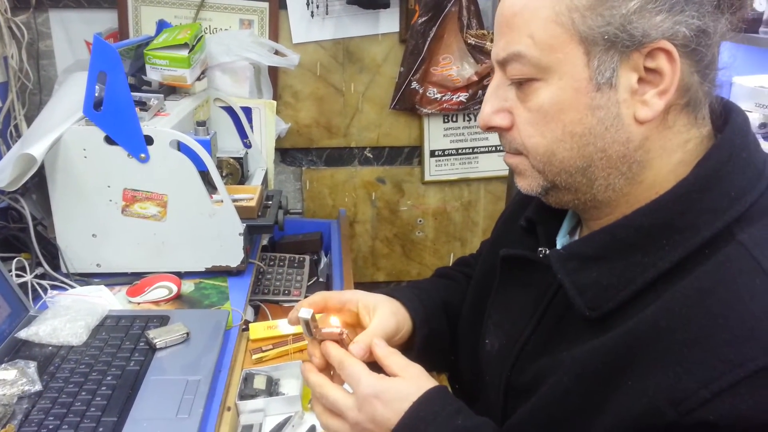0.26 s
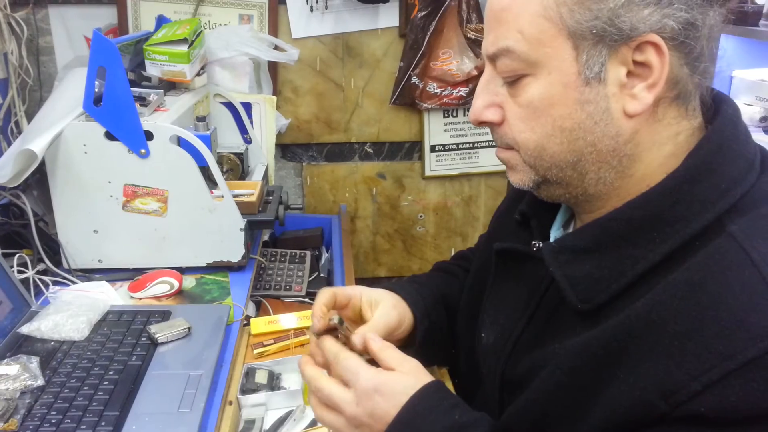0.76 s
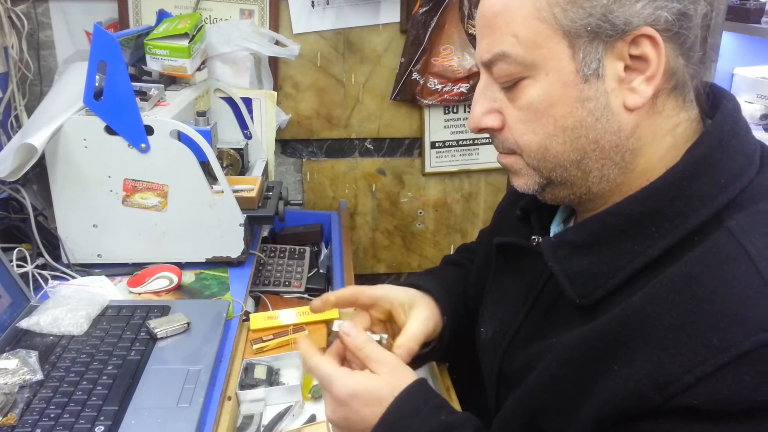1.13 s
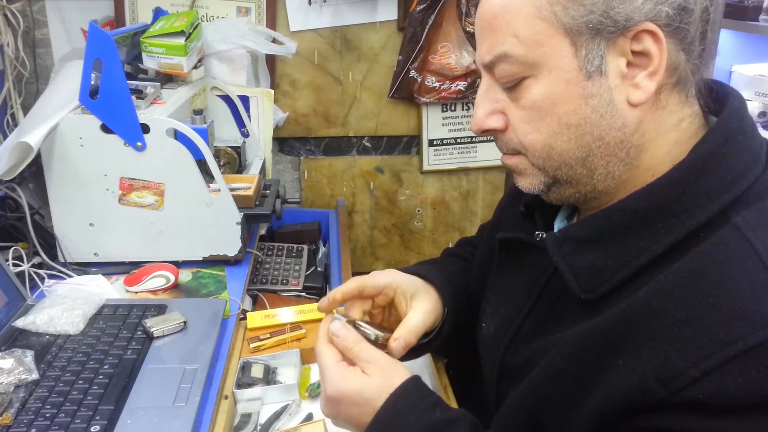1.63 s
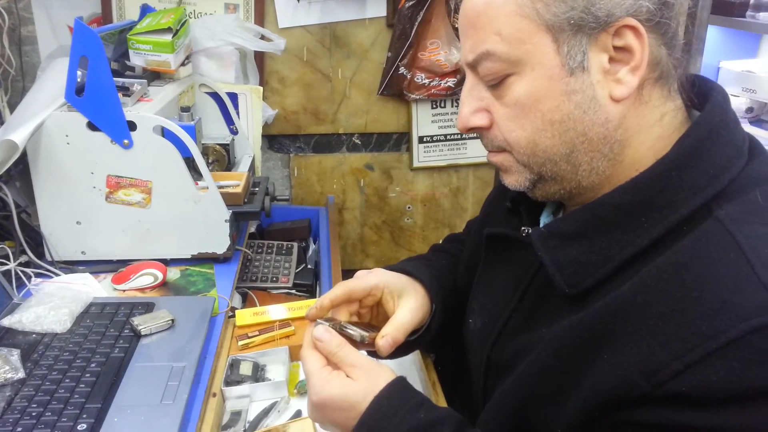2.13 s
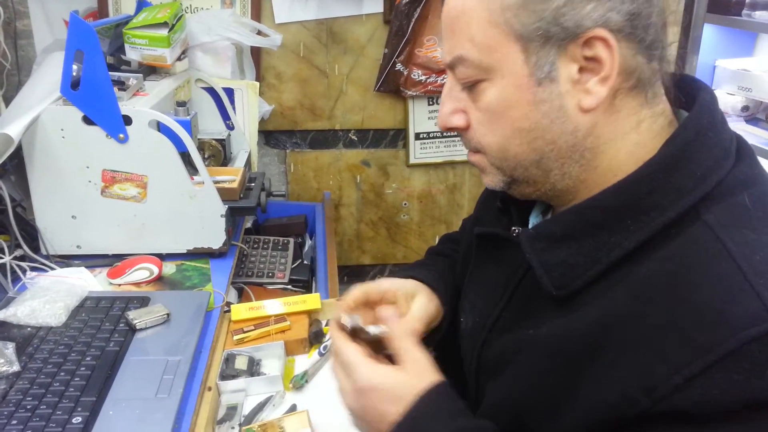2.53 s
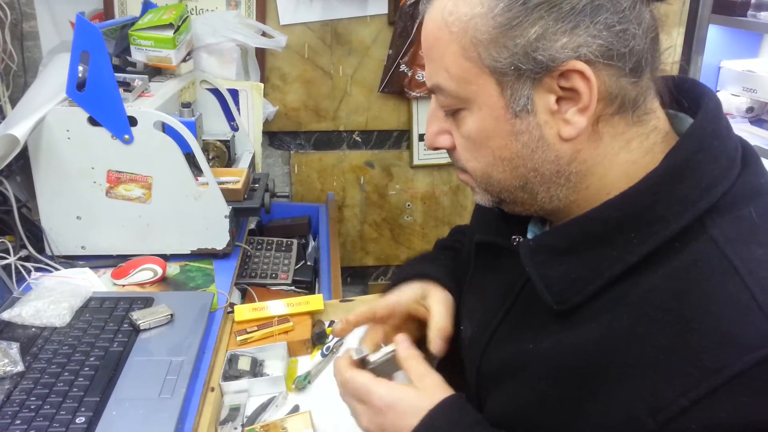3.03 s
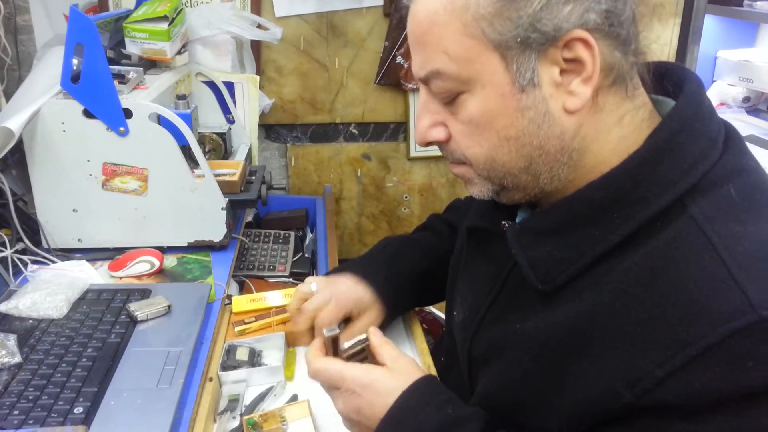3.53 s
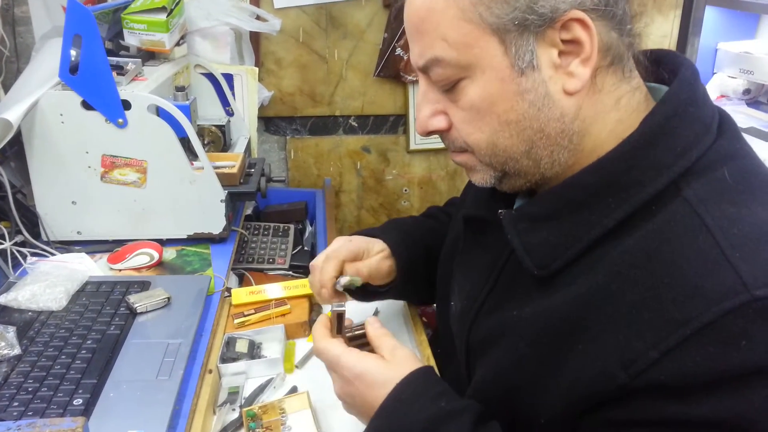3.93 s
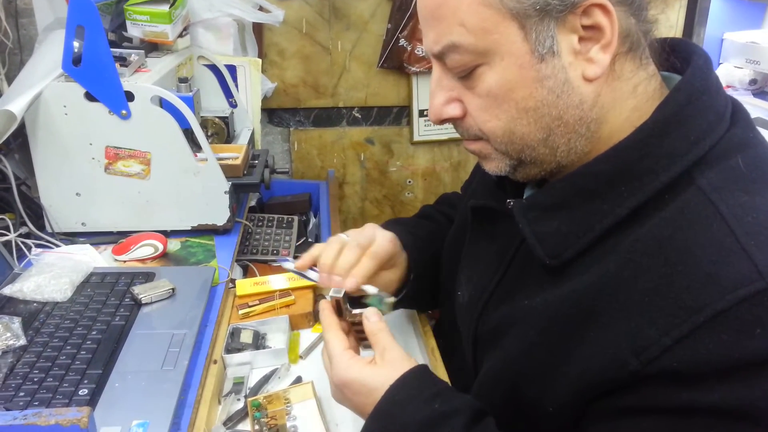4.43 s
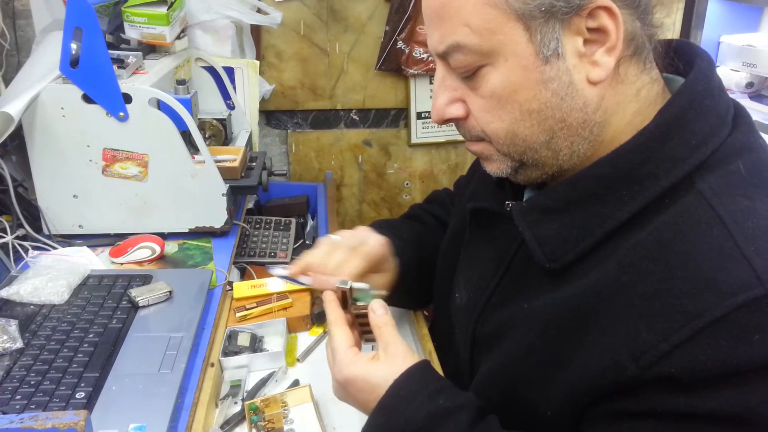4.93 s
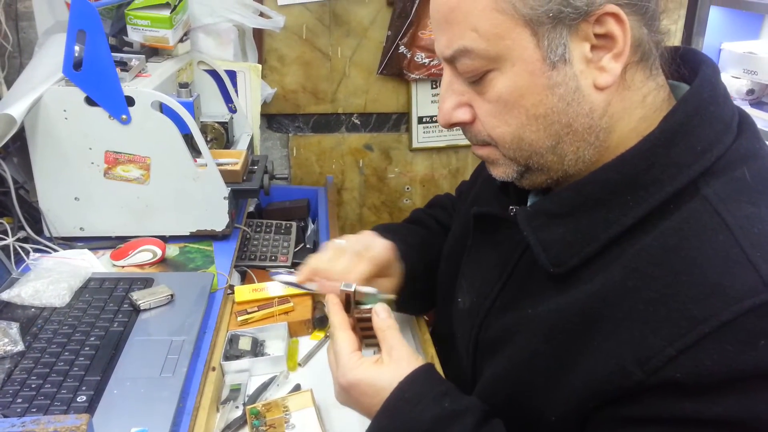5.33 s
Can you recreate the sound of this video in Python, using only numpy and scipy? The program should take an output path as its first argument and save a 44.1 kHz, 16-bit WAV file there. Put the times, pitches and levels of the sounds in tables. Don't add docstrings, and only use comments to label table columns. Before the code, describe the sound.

Close stereo phone sound of a lighter being handled: soft background hum, one very loud, slightly clipped snap, a clinking flick with a short high ring, near-quiet with a tick or two, then two bursts of woody knocking and scraping, small metal clicks and dry finger rubbing. The background swells around loud sounds; little reverberation.

```python
import sys
import numpy as np
from scipy import signal
from scipy.io import wavfile
from scipy.ndimage import uniform_filter1d

SR = 44100
rng = np.random.default_rng(int(sys.argv[2]) if len(sys.argv) > 2 else 0)


def pcm_store(signal):
    levels = np.round(np.clip(np.atleast_2d(signal), -1, 1) * 32767)
    wavfile.write(sys.argv[1], SR, levels.astype(np.int16).T)


def ratio_of_db(decibels):
    return 10 ** (np.asarray(decibels, float) / 20)


N = 246166

AIR_LAG, LAG = -17, -4
NEAR_DEEP_HZ = 1300
# mode_hz, width_hz, level_db
OPEN_CASE = [(800, 250, -4), (2000, 250, -4), (3390, 120, 7), (4850, 90, 5), (7480, 150, 1), (9200, 150, 3),
             (12400, 900, -1)]
# mode_hz, width_hz, level_db
CLOSED_CASE = [(800, 250, -12), (2000, 250, -2), (3430, 320, 1), (4850, 110, 5), (7510, 150, 2),
               (9220, 150, 7), (12300, 900, -1)]
# mode_hz, width_hz, level_db
HOLLOW = [(430, 160, -11), (900, 99, 0), (1474, 120, -6.5), (2000, 143.4, -8)]
# freq_hz, level_db
TOUCH_SPECTRUM = [(150, -2.5), (700, -8.5), (1900, 1.5), (3400, 1.5), (4900, -4), (9000, -6),
                  (11500, -15.5), (14600, -36)]


def evened(x):
    return x / np.sqrt(np.mean(x ** 2) + 1e-20)


def read(points, hz):
    f, value = np.transpose(points)
    return np.interp(np.log(hz + 1), np.log(f + 1), value)


def along(tables, column):
    t, value, gate = np.arange(N) / SR, np.zeros(N), np.zeros(N)
    for rows in tables:
        rows = np.array(rows)
        inside = (t >= rows[0, 0]) & (t <= rows[-1, 0])
        value[inside] = np.interp(t[inside], rows[:, 0], rows[:, column])
        gate[inside] = 1
    return value, gate


def level(tables, column, soft=60):
    db, gate = along(tables, column)
    return uniform_filter1d(ratio_of_db(db) * gate, int(soft))


def swells(rows, hold_s=0):
    t = np.arange(N) / SR
    total = 0
    for s, db, rise, fall, *_ in rows:
        away = np.maximum((s - hold_s - t) / rise, (t - s - hold_s) / fall)
        total = total + ratio_of_db(db - 20 * np.maximum(away, 0))
    return total


def colour(x, spectrum, even=True):
    hz = abs(np.fft.fftfreq(4096, 1 / SR))
    log_gain = np.log(ratio_of_db(np.maximum(read(spectrum, hz), -90)))
    taps = np.fft.ifft(np.exp(np.conj(signal.hilbert(log_gain)))).real[:2048]
    taps = taps / np.linalg.norm(taps) ** even
    return signal.oaconvolve(x, taps.reshape((1,) * (x.ndim - 1) + (-1,)), axes=-1)[..., :N]


def highpass(x, order, hz):
    return signal.sosfilt(signal.butter(order, hz, "high", fs=SR, output="sos"), x)


def resonate(x, hz, width):
    r = np.exp(-np.pi * width / SR)
    if np.ndim(hz) == 0:
        return 2 * signal.lfilter([1 - r], [1, -r * np.exp(2j * np.pi * hz / SR)], x).real
    turn = np.exp(2j * np.pi * np.cumsum(hz) / SR)
    return 2 * (turn * signal.lfilter([1 - r], [1, -r], x / turn)).real


def body(x, modes, ring_db):
    ringing = 0
    for k, (hz, width, db) in enumerate(modes):
        ringing = ringing + (-1) ** k * ratio_of_db(db) * resonate(x, hz, width)
    return x + ratio_of_db(ring_db) * ringing


def ports(pan_db):
    return ratio_of_db(pan_db * np.array([[.5], [-.5]]))


def pair(same, lag, deep_hz=500):
    a, b = rng.standard_normal((2, N))
    same = np.clip(same, 0, 1)
    treble = np.array([np.roll(a, int(lag)), same * a + np.sqrt(1 - same ** 2) * b])
    low, high = (signal.butter(1, deep_hz, kind, fs=SR) for kind in ("low", "high"))
    return signal.lfilter(*low, a + 0.3 * (treble - a)) + signal.lfilter(*high, treble)


def grit(rough_db, span):
    return evened(ratio_of_db(rough_db * evened(uniform_filter1d(rng.standard_normal(N), int(span)))))


def blows(table, spectrum, modes, ring_db, own_db, sharpness, pan_db):
    shape, own_hz = np.zeros(N), np.full(N, table[0][4] * 1.)
    t = np.arange(6000) / SR
    for s, db, rise, t60, hz in table:
        at = round(s * SR)
        shape[at:][:len(t)] += np.clip(t / rise, 0, 1) * ratio_of_db(db - 60 * t / max(t60, .004))
        own_hz[at:] = hz
    rattle = shape * ports(pan_db) * pair(.5, LAG, NEAR_DEEP_HZ) * grit(1.2, 30)
    width = np.mean(table, 0)[4] / sharpness
    own = resonate(resonate(rattle, own_hz, width), own_hz, width)
    return body(colour(rattle, spectrum), modes, ring_db) + ratio_of_db(own_db) * own


def tone(hz, gain, width):
    fuzz = evened(resonate(pair(0.37, 0.9), hz, width))
    steady = 1.15 * np.sqrt(2) * np.sin(2 * np.pi * np.cumsum(hz) / SR)
    return (steady + .6 * fuzz) * gain


def air():
    # freq_hz, level_db
    air_spectrum = [(15, -67), (25, -33), (54, -34), (75, -13), (111, -16.5), (145, -10), (211, -16.5),
                    (306, -14.5), (508, -21.5), (565, -20.5), (663, -28), (799, -27.5), (3550, -35.5),
                    (9030, -37), (14600, -40.5)]
    _, _, z = signal.stft(colour(pair(0.36, AIR_LAG), air_spectrum), SR, nperseg=512)
    patches = rng.standard_normal(z.shape[1:])
    patches = evened(uniform_filter1d(uniform_filter1d(patches, 8, 0), 8, 1))
    return evened(signal.istft(z * ratio_of_db(1.2 * patches), SR, nperseg=512)[1][:, :N])


def fan_hum():
    # tone_hz, width_hz, level_db
    hums = [(80, 30, -76.5), (145, 10, -72), (7504, 3, -99)]
    low, fan, thin = (ratio_of_db(db + 69.5) * evened(resonate(pair(0.96, 0), hz, w)) for hz, w, db in hums)
    eased = np.clip((np.arange(N) / SR - 3.89) / 0.38, 0, 1)
    return low * ratio_of_db(-1.5 * eased) + fan * ratio_of_db(-9 * eased) + thin


def whine():
    # start_s, length_s, from_hz, to_hz, level_db
    jumps = [
        (.025, .305, 11200, 11650, -88),
        (1.335, .035, 11600, 11600, -94),
        (1.905, .055, 11500, 11700, -95),
        (2.56, .045, 11500, 11500, -95),
        (3.185, .06, 11600, 11700, -95),
        (5.145, .295, 11750, 11350, -90.5),
    ]
    t = np.arange(N) / SR
    hz = 9130 + 17 * t
    db = -94.5 + .75 * t
    wobble_hz = 140 * evened(uniform_filter1d(rng.standard_normal(N), 1200))
    for s, length, from_hz, to_hz, jump_db in jumps:
        up = (t >= s) & (t < s + length)
        glide_hz = from_hz + (to_hz - from_hz) * (t - s) / length
        hz[up] = (glide_hz + wobble_hz)[up]
        db[up] = jump_db
    return tone(hz, ratio_of_db(db), 45.7)


def hoots():
    # peak_s, level_db, rise_s, fall_s, pitch_hz
    calls = [
        (.27, -81, .05, 0.19, 807),
        (.33, -80, .1, 0.14, 811.2),
        (.39, -98, .1, 0.043, 807),
        (.88, -80, .057, 0.06, 779),
        (1.909, -74, .02, .016, 818.6),
    ]
    s, hz = np.transpose(calls)[[0, 4]]
    return tone(np.interp(np.arange(N) / SR, s, hz), swells(calls), 9.1)


def background(lift_db):
    flutter = grit(1.1, 2000)
    return ratio_of_db(-68 + lift_db) * (ratio_of_db(-3.5) * air() + fan_hum()) * flutter + whine() + hoots()


def finger_rubs():
    # peak_s, level_db, fall_s
    strokes = [(.29, -74, 0.13), (2.554, -72.5, 0.11), (4.638, -64.5, 0.027), (4.693, -54.5, 0.26),
               (4.804, -61.5, 0.073), (4.925, -60, 0.0487), (5.01, -68, .12), (5.108, -66, 0.081),
               (5.212, -61.5, 0.017), (5.284, -58, 0.067), (5.408, -58, 0.017), (5.492, -60, 0.087)]
    # freq_hz, level_db
    skin_spectrum = [(180, -10.5), (300, -7.5), (443, 1.5), (488, -9), (783, -8.5), (1820, -10.5),
                     (2650, -12), (3850, -6.5), (6680, -10), (9250, -6), (14600, -17.5)]
    rub = evened(colour(pair(0.17, AIR_LAG) * grit(2.5, 68), skin_spectrum))
    rows = [(s, db - 3.5, 0.017, 0.72 * fall) for s, db, fall in strokes]
    return ratio_of_db(1.5) * rub * swells(rows, hold_s=0.017)


def ticks():
    # start_s, peak_db, rise_s, t60_s,
    # own_hz
    clicks = [(.392, -67.5, 0.005, 0.061, 9300), (1.1, -52, 0.0088, 0.24, 9200),
              (1.28, -62.5, 0.0022, 0.02, 9740), (1.288, -62.5, 0.002, 0.032, 11150),
              (1.92, -70, .008, 0.11, 11160), (2.152, -65, 0.0026, 0.025, 7870),
              (2.156, -48, .0003, 0.1, 9470), (2.545, -69, 0.014, 0.076, 8880),
              (3.19, -65.5, 0.032, 0.15, 11100), (3.4872, -52, 0.00092, 0.037, 6030),
              (3.5575, -47, .001, 0.084, 8900), (3.847, -57, .001, 0.053, 7000),
              (4.245, -66, 0.0055, 0.096, 9700)]
    # freq_hz, level_db
    click_spectrum = [(500, -49), (1500, -34), (3500, -7), (6500, -15), (9600, 0.5), (12000, -6.5),
                      (14600, -21)]
    return blows(clicks, click_spectrum, OPEN_CASE, ring_db=-28.5, own_db=2.7, sharpness=45.01, pan_db=1.77)


def lid_snaps():
    # start_s, peak_db, rise_s, t60_s, own_hz
    snaps = [
        (.6375, -51, 0.0007, 0.01, 9500),
        (.6445, -48.5, .001, 0.0052, 9500),
        (.654, -39.5, 0.0044, 0.025, 4000),
        (.6572, -31, 0.0004, 0.02, 3400),
        (.6601, -0.5, 0.0001, 0.013, 7600),
        (.6628, -12, 0.0003, .016, 9200),
    ]
    # freq_hz, level_db
    snap_spectrum = [(120, -58.5), (350, -40.5), (800, -23), (1250, -21), (2000, -11.5), (3000, -6),
                     (5000, -1), (6300, -2.5), (7500, -1.5), (9200, -3.5), (12900, -9), (14600, -13)]
    return blows(snaps, snap_spectrum, CLOSED_CASE, ring_db=7.6, own_db=5.1, sharpness=30.0, pan_db=3.2)


def pings():
    # start_s, pitch_hz, peak_db, t60_s, left_right_db
    struck_parts = [(.6603, 781.2, -21, 0.008, 17), (0.6596, 1575, -22.5, 0.025, 6),
                    (.6604, 1993, -17, 0.018, 4), (1.0857, 1586, -36, 0.04, -4),
                    (1.0856, 2190, -35.5, 0.021, 19), (1.0867, 3980, -36, 0.022, 2),
                    (1.0865, 4650, -43, 0.041, -2), (1.0865, 2493, -26, 0.034, 5),
                    (.6604, 3510, -20.5, 0.033, 0.5), (0.6609, 3020, -17.5, 0.02, -12),
                    (1.086, 7640, -31.5, 0.039, 5.5), (3.491, 4300, -44, 0.028, -4),
                    (3.56, 5070, -39, 0.031, 3.5), (3.402, 3150, -39.5, 0.035, 7),
                    (.706, 1014, -53, 0.089, -12), (3.73, 810, -42.5, 0.046, 16),
                    (3.818, 960, -44, 0.054, -5), (3.838, 462, -28, 0.11, 4.5),
                    (3.842, 966, -34.5, 0.11, -2), (3.851, 430, -21, 0.062, 0), (3.883, 503, -38, 0.06, -4),
                    (3.929, 940, -37, 0.05, 10), (3.931, 1585, -38, 0.029, 11), (3.943, 960, -42, 0.092, 12),
                    (3.958, 945, -38.5, 0.078, -1), (3.688, 2100, -47.5, 0.068, -6.5),
                    (3.85, 4800, -39.5, 0.045, -1), (4.244, 691, -52.5, 0.15, -1),
                    (4.244, 2212, -56.5, 0.12, 3.5), (4.25, 4200, -56.5, 0.11, 2),
                    (4.41, 4930, -48, 0.15, 7), (4.407, 1625, -45, 0.059, -2),
                    (4.412, 2340, -45.5, 0.091, -2),
                    (.6603, 1041, -24, .008, 3), (0.6656, 4869, -23, .06, -2), (.682, 4820, -33, .08, 0),
                 (.684, 7507, -33, 0.062, 4), (.688, 3509, -34, 0.087, 0), (.738, 4800, -43, .06, 0),
                 (1.086, 2678, -31, 0.031, 0), (1.086, 2957, -30, 0.029, 0), (3.4045, 3330, -39.5, 0.04, 8),
                 (3.4527, 2960, -43.5, 0.058, 0), (3.4888, 680, -26, .012, 0), (3.4915, 900, -26, 0.014, 4),
                 (3.5579, 558, -24.5, .016, 3.5), (3.5605, 1720, -26, 0.013, 10),
                 (3.5655, 800, -34, 0.013, -4), (3.5738, 624, -39, .012, -2), (3.8365, 439, -22.5, .08, 0),
                 (3.964, 957, -40, .07, -2), (3.847, 2000, -38.5, 0.022, 5), (3.885, 3350, -40, 0.017, 0),
                 (4.262, 2216, -50, .03, -4), (4.286, 2115, -61.5, .06, 0), (4.288, 4120, -62, .08, 0),
                 (4.415, 5250, -44, 0.068, 0), (4.424, 2280, -44, .04, 0), (4.44, 4760, -53, .07, 0),
                 (4.458, 4500, -53, .06, 0), (4.468, 5400, -52, .04, 0)]
    out, t = np.zeros((2, N + 8000)), np.arange(8000) / SR
    tremble = grit(2.0, 120)
    for s, hz, db, t60, pan_db in struck_parts:
        at = round(s * SR)
        sound = np.minimum(2 * t * hz, 1) * ratio_of_db(db - 60 * t / t60) * np.sin(2 * np.pi * hz * t)
        out[:, at:at + len(t)] += ports(pan_db) * sound
    return highpass(out[:, :N] * tremble, 3, 550)


def lid_rebound():
    # start_s, peak_db, rise_s, t60_s, own_hz
    bounces = [
        (.667, -26, 0.0019, 0.049, 4808),
        (.678, -23.5, 0.0065, 0.055, 4780),
        (.692, -28, .003, 0.039, 4670),
        (.703, -29.5, .006, 0.091, 4100),
        (.725, -39.5, 0.0073, 0.11, 4800),
        (.755, -48, 0.009, 0.077, 4810),
    ]
    # freq_hz, level_db
    bounce_spectrum = [(1400, -44), (1800, -20.5), (2500, -17), (3000, -1.5), (6300, -4), (9000, -3),
                       (12500, -7), (14600, -20.5)]
    return blows(bounces, bounce_spectrum, CLOSED_CASE, ring_db=-4.5, own_db=0.3, sharpness=5.0, pan_db=-2.5)


def jolts():
    # peak_s, level_db, rise_s, fall_s
    shudders = [
        (1.094, -55, .008, .07),
        (1.15, -63, .04, .1),
        (.76, -70, .04, .06),
    ]
    # freq_hz, level_db
    shudder_spectrum = [(90, -10), (150, -2), (320, 0), (550, -3), (1000, -12.5), (1500, -12), (2500, -19),
                        (5000, -39)]
    return evened(colour(pair(0.94, LAG), shudder_spectrum)) * swells(shudders)


def lid_flicks():
    # start_s, peak_db, rise_s, t60_s, own_hz
    flicks = [
        (1.053, -71.5, 0.002157, 0.048, 3390),
        (1.0635, -51, 0.0006, 0.065, 7960),
        (1.0772, -38.5, .0005, 0.035, 12590),
        (1.0857, -20.5, 0.0003, 0.029, 4040),
        (1.09, -27, .002, .07, 3903),
        (4.669, -64, 0.00202, .06, 4775),
        (4.6835, -41.5, 0.00036, 0.017, 7510),
    ]
    # freq_hz, level_db
    flick_spectrum = [(120, -29.5), (1250, -34.5), (1600, -22.5), (2300, -8.5), (3400, -2), (4200, -4),
                      (5500, -13), (7500, -9.5), (10300, -16), (14600, -25.5)]
    hits = blows(flicks, flick_spectrum, OPEN_CASE, ring_db=-5.0, own_db=3.1, sharpness=6.7, pan_db=-3.8)
    return highpass(hits, 4, 1450)


def lid_ring():
    # time_s, level_db, left_right_db
    swing = [
        (1.086, -19.5, -6.5),
        (1.094, -18.5, -8.5),
        (1.104, -16.5, -9.5),
        (1.118, -21.5, -12.5),
        (1.15, -35, -16),
        (1.172, -54.5, -19.5),
        (1.205, -74, -3),
        (1.235, -70.5, -2),
        (1.32, -93.5, -9.5),
    ]
    # peak_s, level_db, rise_s, fall_s
    nudges = [
        (1.056, -64, 0.003, .08),
        (4.686, -46, .003, .03),
        (4.698, -53, 0.012, 0.019),
        (4.74, -65, 0.041, 0.024),
        (4.779, -63, .004, 0.038),
        (4.8, -61.5, 0.0037, 0.051),
        (4.82, -63.5, 0.027, 0.014),
    ]
    # peak_s, level_db, rise_s, fall_s
    uppers = [
        (1.087, -40, 0.0006, 0.018),
        (1.104, -52.5, 0.00516, .03),
        (4.686, -46, 0.0012, 0.033),
        (4.798, -65, 0.0043, 0.037),
    ]
    t = np.arange(N) / SR
    late = np.array([[0], [1]])
    pan_db, swinging = along([swing], 2)
    pan_db = pan_db - 3 * (1 - swinging)
    fresh = swinging * np.exp(-np.maximum(t - swing[0][0], 0) / .012)
    turn = 2 * np.pi * np.cumsum(3406.5 - 22 * fresh) / SR
    low = (level([swing], 1, soft=70) + swells(nudges)) * np.sin(turn + late * (1.8 + 1.2 * fresh))
    upper = swells(uppers) * grit(6.0, 130) * np.sin(2 * np.pi * 7530 * t + late * .8)
    return ratio_of_db(6.0) * ports(pan_db) * (low + upper)


def taps():
    # start_s, peak_db, rise_s, t60_s, own_hz
    touches = [(1.68, -65, 0.033, 0.3, 4040), (1.76, -75, 0.032, 0.34, 4097),
               (3.688, -57, 0.003, 0.013, 3970), (4.242, -56.5, 0.003, 0.049, 2050),
               (4.252, -55.5, 0.0099, 0.087, 3910), (4.392, -66, 0.0022, 0.058, 6000),
               (4.398, -45.5, 0.002, 0.054, 5400), (4.407, -39, 0.0042, 0.055, 4820),
               (4.42, -44.5, 0.0058, 0.057, 5100), (4.459, -53, 0.0044, 0.06, 2000),
               (4.466, -55.5, 0.004, 0.054, 5140)]
    return blows(touches, TOUCH_SPECTRUM, OPEN_CASE, ring_db=-25.0, own_db=15.8, sharpness=5.3, pan_db=0.31)


def sliding():
    # time_s, pressure_db
    slides = [
        [(3.34, -85), (3.386, -64.5), (3.402, -48.5), (3.47, -41), (3.525, -55), (3.565, -40.5), (3.61, -52),
         (3.66, -101.5)],
        [(3.684, -97), (3.692, -54.5), (3.76, -47.5), (3.812, -46.5), (3.85, -39.5), (3.906, -43),
         (3.96, -45.5), (4.04, -71.5), (4.1, -90)],
    ]
    # peak_s, level_db, rise_s, fall_s
    scrapes = [
        (3.404, -57, 0.016, 0.16),
        (3.47, -71, 0.15, 0.069),
        (3.565, -38.5, 0.014, 0.013),
        (3.693, -47.5, 0.0045, 0.207),
        (3.76, -69, 0.069, 0.062),
        (3.851, -42.5, 0.015, 0.077),
        (3.455, -63, .02, .04),
        (3.493, -64, 0.0083, 0.042),
        (3.888, -56.5, 0.0092, 0.027),
    ]
    # freq_hz, level_db
    rumble_spectrum = [(35, -27), (60, -27), (350, 7), (396, 4), (595, 0), (950, 8), (1150, -10),
                       (1520, -4), (2500, -47), (3250, -59), (5500, -120)]
    # freq_hz, level_db
    fizz_spectrum = [(600, -25), (1200, -14), (2100, -4), (3000, -12), (4100, -5), (5000, -14), (9400, -20),
                     (12200, -28), (13000, -60), (14600, -60)]
    # mode_hz, width_hz, level_db
    box_lid = [(2100, 300, -1), (4100, 350, 4), (900, 200, -5)]
    rumble = colour(pair(.7, LAG, NEAR_DEEP_HZ) * grit(1.8, 200), rumble_spectrum)
    rumble = evened(body(rumble, HOLLOW, 4.0))
    fizz = colour(pair(.4, LAG) * grit(1.5, 60), fizz_spectrum)
    fizz = evened(body(fizz, box_lid, 3.))
    pressure = level(slides, 1)
    return ratio_of_db(-2.0) * rumble * pressure + ratio_of_db(1.0) * fizz * (ratio_of_db(-20) * pressure + swells(scrapes))


def thuds():
    # peak_s, level_db, rise_s, fall_s
    leans = [
        (3.385, -54.5, 0.038, 0.28),
        (3.56, -57.5, 0.16, 0.041),
        (3.72, -55.5, .04, 0.41),
        (4.42, -56.5, 0.055, 0.1),
    ]
    # freq_hz, level_db
    lean_spectrum = [(20, -24), (45, -18.5), (80, 6), (140, -7), (260, -36)]
    return evened(colour(pair(0.92, LAG), lean_spectrum)) * swells(leans)


def bumps():
    # start_s, peak_db, rise_s, t60_s, own_hz
    padded = [
        (3.389, -50, 0.0023, 0.043, 351),
        (3.432, -35, 0.0025, 0.064, 1680),
        (3.55, -30.5, 0.00099, 0.066, 950),
        (3.566, -28, 0.00095, 0.034, 900),
        (3.574, -35, .001, 0.044, 500),
        (3.818, -38, 0.0012, 0.048, 970),
        (3.929, -35, 0.0011, 0.023, 935),
        (3.955, -45, 0.0051, 0.09, 960),
        (4.391, -55, 0.0026, 0.035, 250),
    ]
    # freq_hz, level_db
    padded_spectrum = [(60, -31), (450, 3.5), (1000, -7), (1800, -5), (2500, -21.5), (4000, -33),
                       (8000, -36), (14600, -54)]
    return blows(padded, padded_spectrum, HOLLOW, ring_db=6.0, own_db=10.0, sharpness=3.5, pan_db=-0.45)


def knocks():
    # start_s, peak_db, rise_s, t60_s, own_hz
    strikes = [(3.401, -34.5, 0.0013, 0.042, 1554), (3.447, -34, 0.0091, 0.1, 421),
               (3.489, -32, 0.00079, 0.07, 930), (3.557, -25, 0.0026, 0.051, 1680),
               (3.573, -41.5, 0.0023, 0.055, 449), (3.73, -39.5, 0.00078, 0.014, 779),
               (3.842, -37.5, 0.0044, 0.077, 930), (3.847, -34.5, 0.016, 0.094, 1537),
               (3.885, -39, 0.0029, 0.02, 509), (3.93, -42, 0.0044, 0.1, 1612),
               (4.245, -55, 0.0084, 0.15, 730)]
    # freq_hz, level_db
    strike_spectrum = [(35, -46), (60, -17), (475, 1.5), (1010, 2), (1280, -11), (1760, -2), (2270, -8),
                       (3050, -6), (7320, -20.5), (8590, -22.5), (14600, -41.5)]
    # mode_hz, width_hz, level_db
    bench = [(357, 340, 0), (875, 87, -47), (1477, 79, 8), (1830, 18.6, -28), (2050, 29, -22),
             (2280, 140, -34)]
    return blows(strikes, strike_spectrum, bench, ring_db=1.5, own_db=14.2, sharpness=2.96, pan_db=-0.34)


def part_fitted():
    # peak_s, level_db, rise_s, fall_s
    pushes = [
        (4.255, -57.5, 0.047, 0.13),
        (4.412, -44, 0.013, 0.097),
    ]
    push = evened(colour(pair(0.19, LAG) * grit(0.63, 130), TOUCH_SPECTRUM))
    return ratio_of_db(-2.0) * push * swells(pushes)


def room(x, start_s=0.022, rise_s=0.0013):
    # freq_hz, t60_s
    decay = [(300, 0.083), (1500, 0.087), (4000, 0.12), (9000, 0.067), (14000, 0.1)]
    taps_in = np.zeros((2, 20000))
    at = np.arange(0, 20000, 20) + rng.integers(0, 20, (2, 1000))
    np.put_along_axis(taps_in, at, rng.choice([-1., 1.], at.shape), 1)
    hz, t, z = signal.stft(taps_in, SR, nperseg=128)
    tail = signal.istft(z * ratio_of_db(-60 * t / read(decay, hz)[:, None]), SR, nperseg=128)[1]
    after = np.arange(tail.shape[1]) / SR
    tail *= np.clip(after / .003, 0, 1) * (.2 + .8 * np.clip((after - start_s) / rise_s, 0, 1))
    far = highpass(x.mean(0), 4, 2600)
    return signal.fftconvolve(far[None], tail / np.linalg.norm(tail[0]), axes=1)[:, :N]


def at_ports(x):
    # freq_hz, left_right_db
    difference = [(60, -0.5), (140, 0), (320, -1.5), (750, 0.5), (1730, -0.5), (2630, -0.5), (4010, -5),
                  (6100, -2.5), (9280, 11), (14100, 9)]
    left = colour(x[0], np.multiply(difference, [1, .5]), even=False)
    right = colour(x[1], np.multiply(difference, [1, -.5]), even=False)
    return np.array([left, right])


def suppressed(near):
    power = abs(uniform_filter1d((near ** 2).mean(0), 1500))
    loud_db = 10 * np.log10(power + 1e-12)
    opening_db = np.clip(0.3 * (loud_db + 70), 0, 10.5)
    keep = np.exp(-1 / (0.046 * SR))
    linger_db = 0.37 * signal.lfilter([1 - keep], [1, -keep], opening_db)
    return background(linger_db) * ratio_of_db(uniform_filter1d(opening_db, 900))


def scene():
    near = finger_rubs() + ticks() + lid_snaps() + pings() + lid_rebound() + jolts() + lid_flicks()
    near = near + taps() + sliding() + thuds() + bumps() + knocks() + part_fitted()
    near = near + ratio_of_db(-8.5) * room(near)
    near = at_ports(near) + lid_ring()
    return near + suppressed(near)


def overload(x):
    shaved = x - np.clip(x, -1, 1)
    return x - signal.sosfiltfilt(signal.butter(2, 900, "high", fs=SR, output="sos"), shaved)


def starve(x, hz, kind, spans):
    band = signal.sosfiltfilt(signal.butter(8, hz, kind, fs=SR, output="sos"), x)
    t = np.arange(N) / SR
    gone = sum(1. * (t > a) * (t < b) for a, b in spans)
    return x - band * uniform_filter1d(gone, 200)


def band_limit(x):
    return signal.sosfilt(signal.butter(12, 14730, fs=SR, output="sos"), x)


def record(dry):
    # from_s, to_s
    top_gone = [
        (3.4, 3.425),
        (3.495, 3.53),
        (3.54, 3.555),
        (3.568, 3.6),
        (3.678, 3.88),
        (3.915, 3.972),
        (4.235, 4.27),
        (4.42, 4.46),
    ]
    mix = starve(overload(dry), 12600, "high", top_gone)
    mix = starve(mix, [600, 1550], "band", [(.687, .72)])
    mix = highpass(mix, 1, 45)
    return band_limit(mix)


dry = scene()
out = record(dry)
pcm_store(out)
```